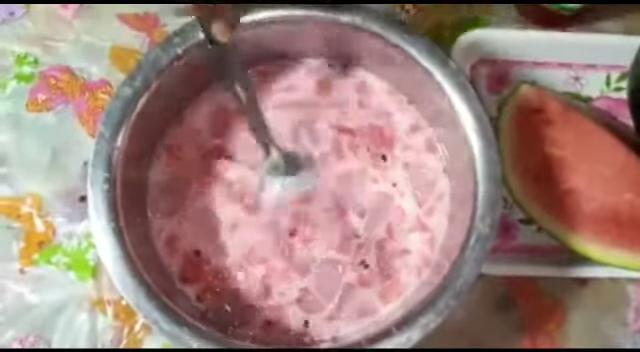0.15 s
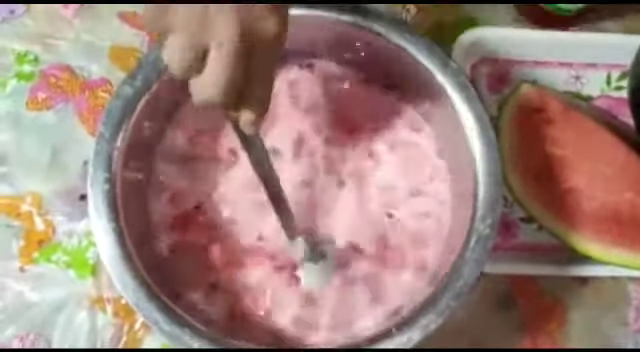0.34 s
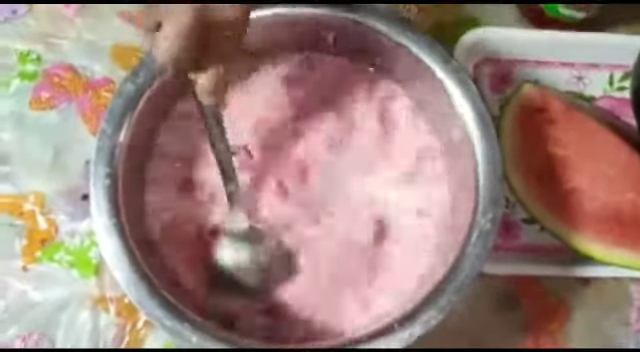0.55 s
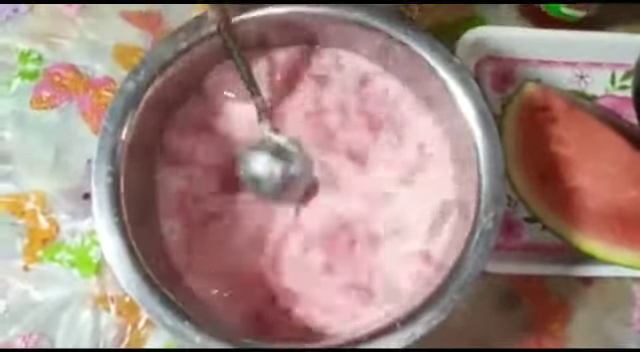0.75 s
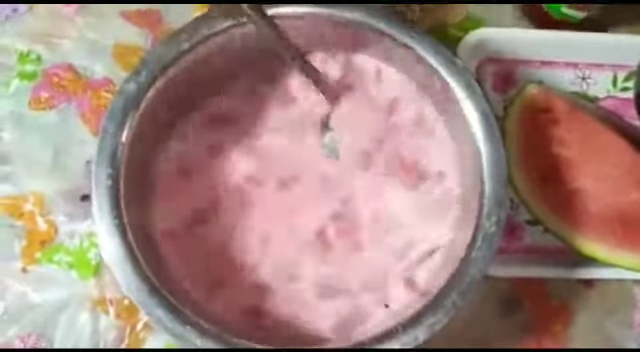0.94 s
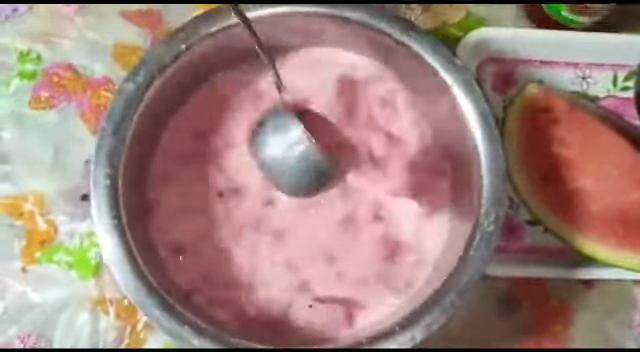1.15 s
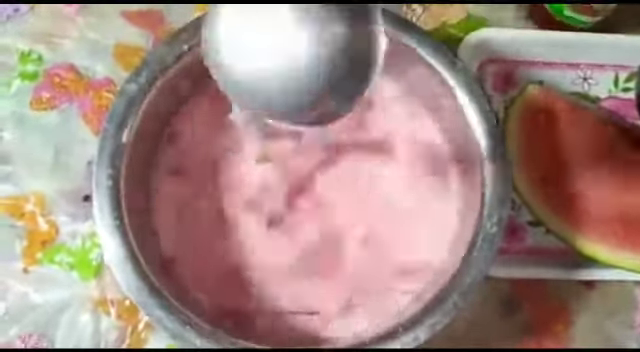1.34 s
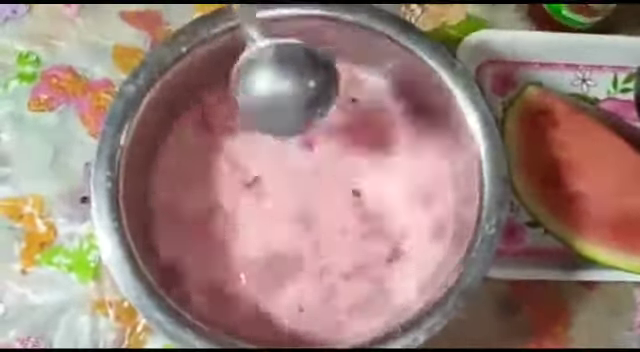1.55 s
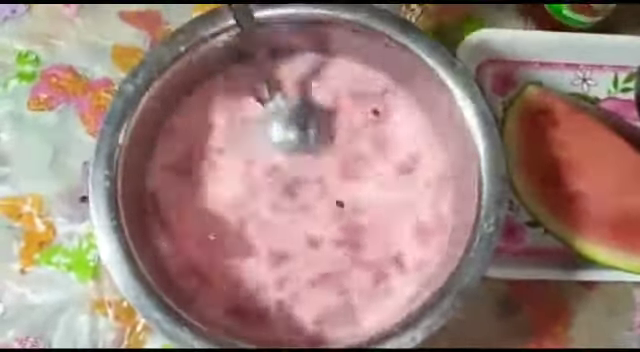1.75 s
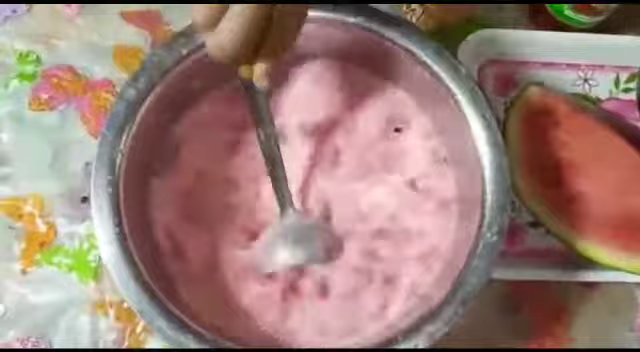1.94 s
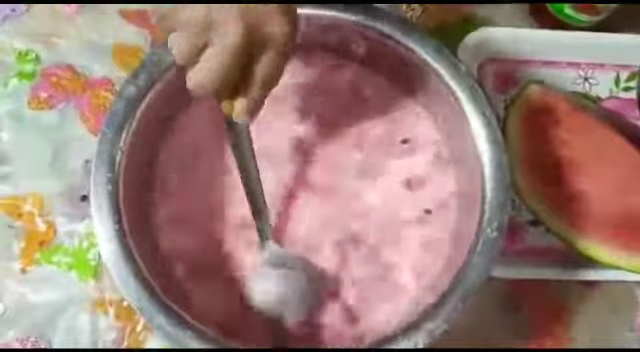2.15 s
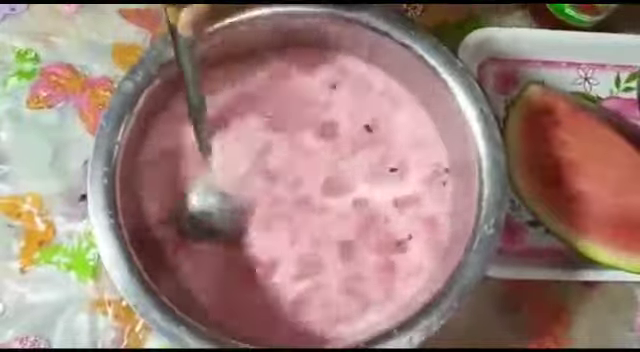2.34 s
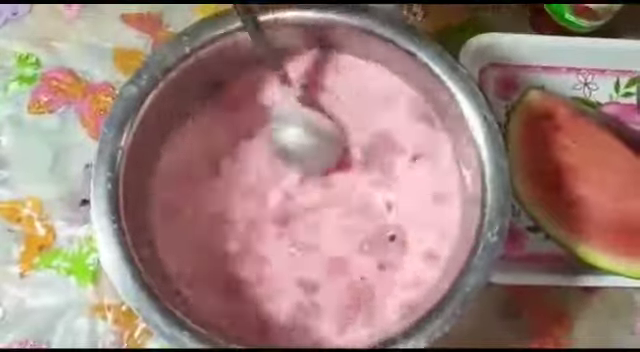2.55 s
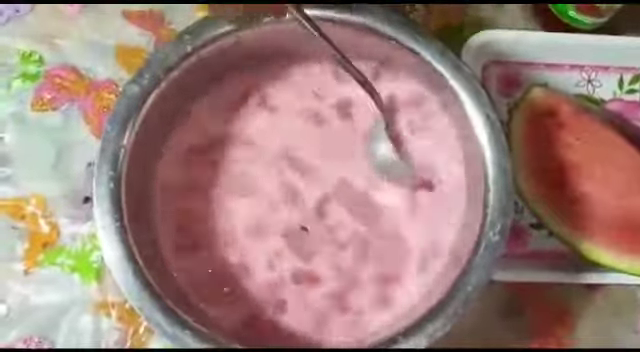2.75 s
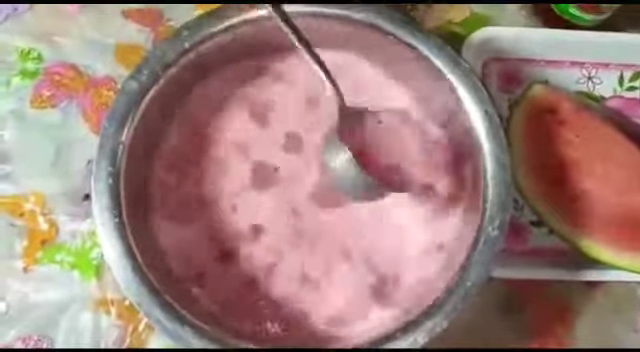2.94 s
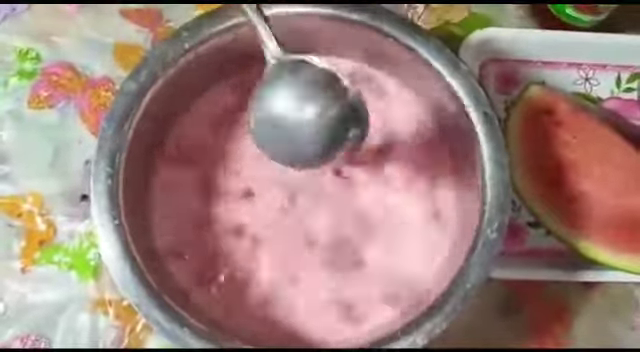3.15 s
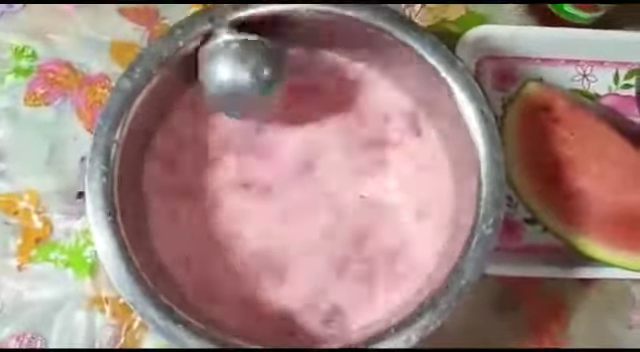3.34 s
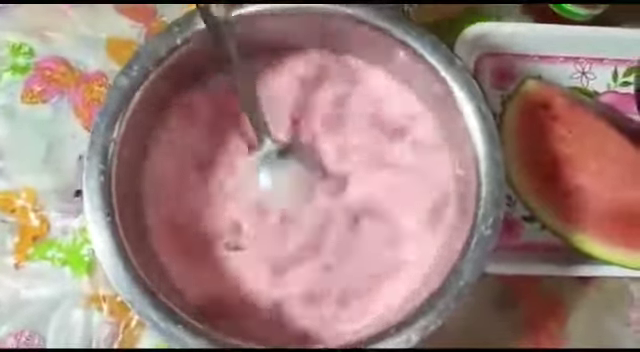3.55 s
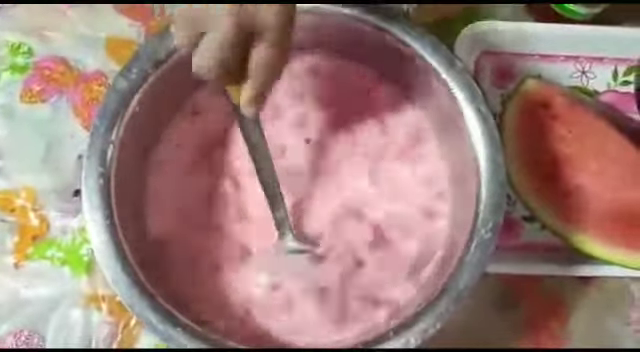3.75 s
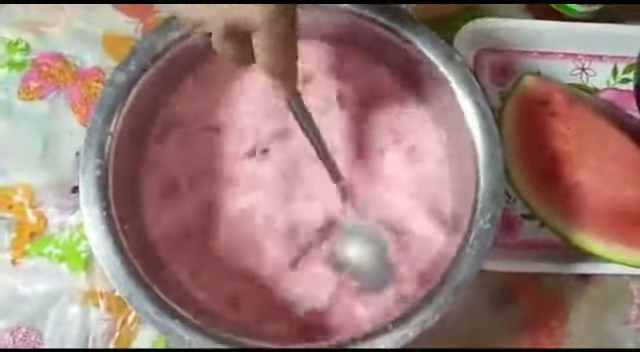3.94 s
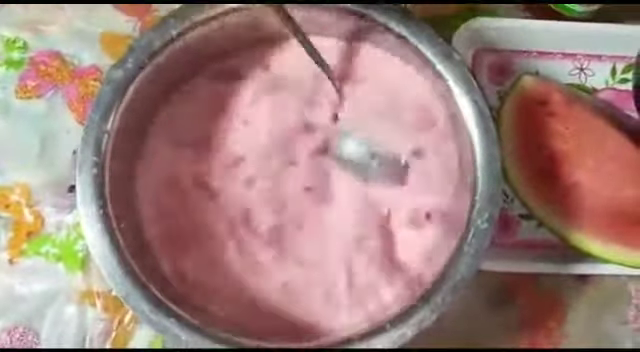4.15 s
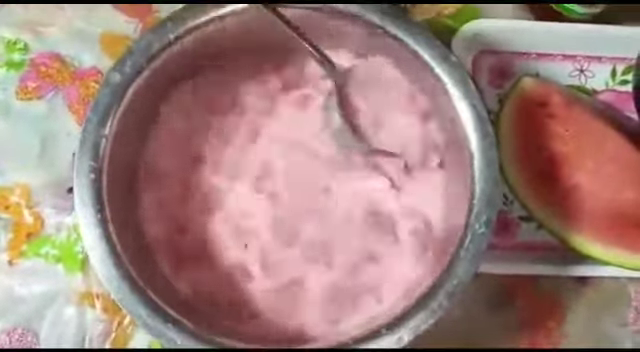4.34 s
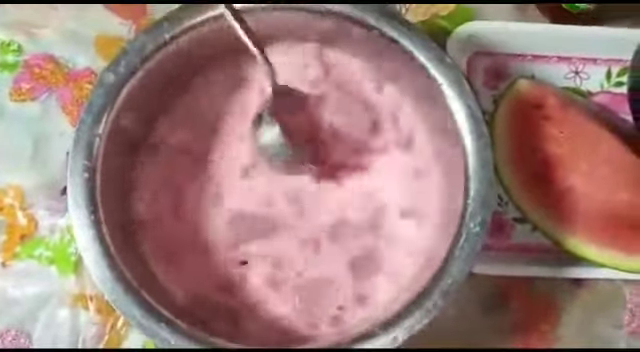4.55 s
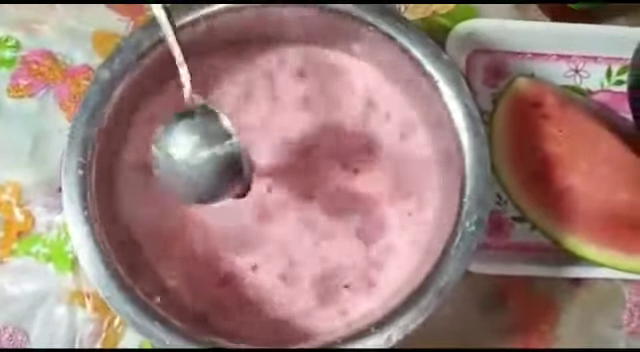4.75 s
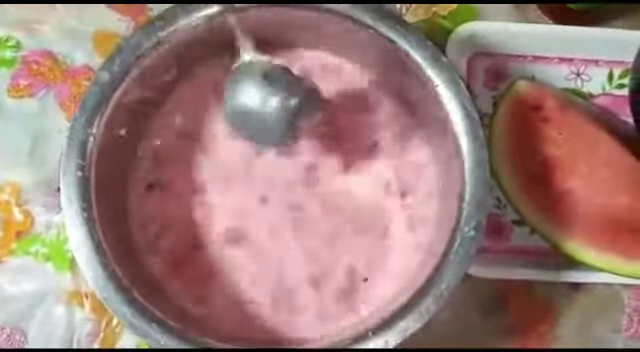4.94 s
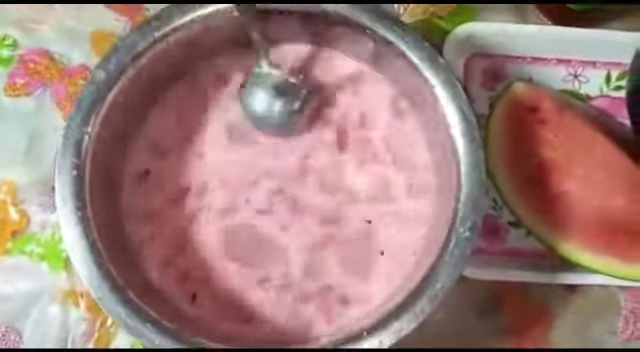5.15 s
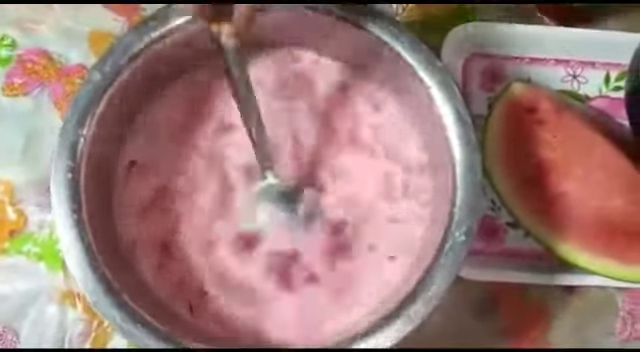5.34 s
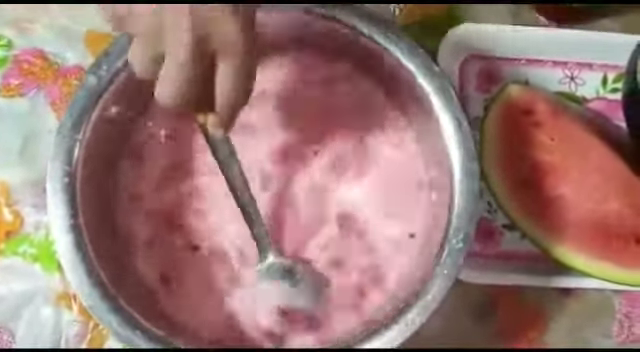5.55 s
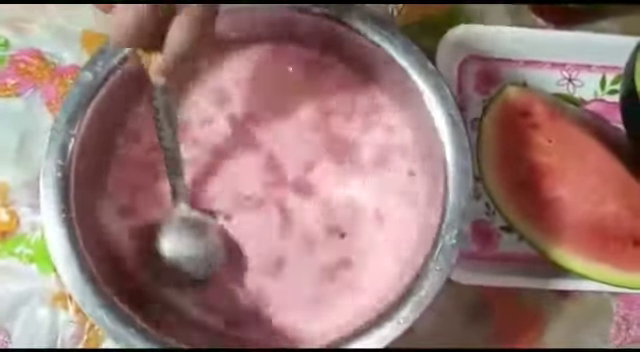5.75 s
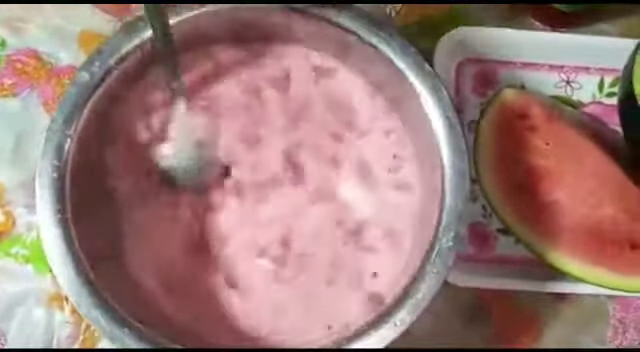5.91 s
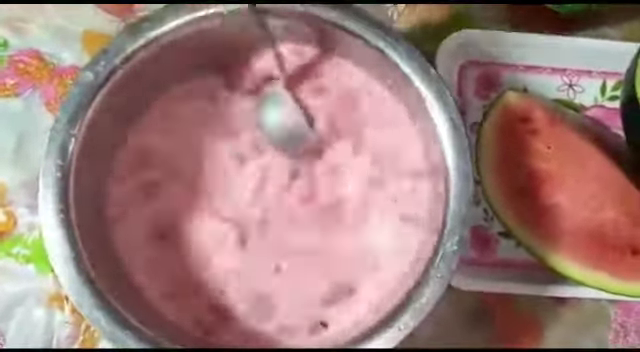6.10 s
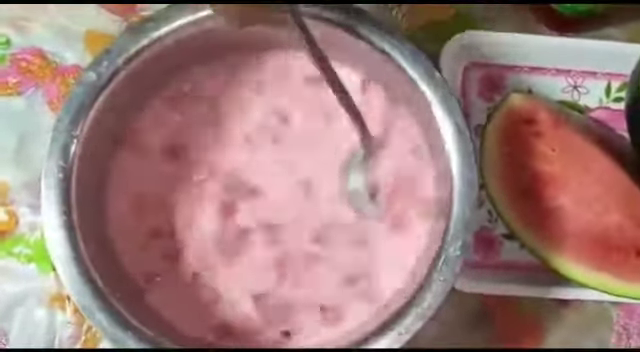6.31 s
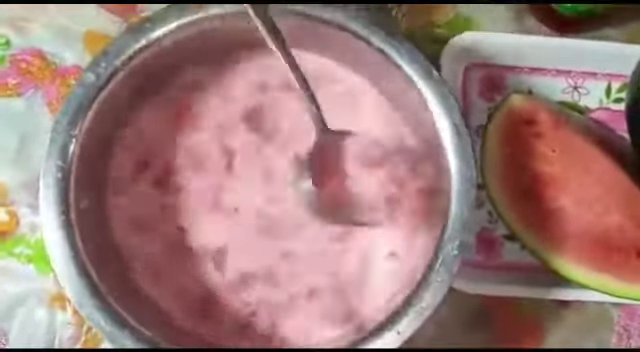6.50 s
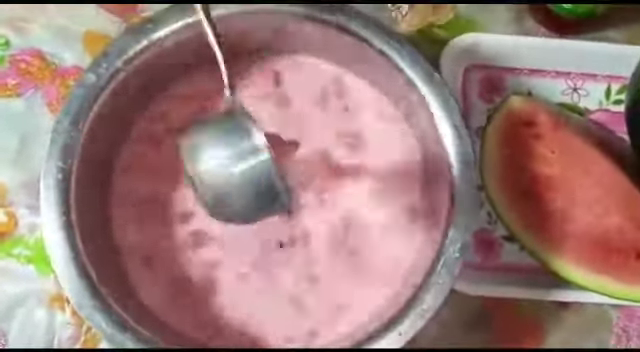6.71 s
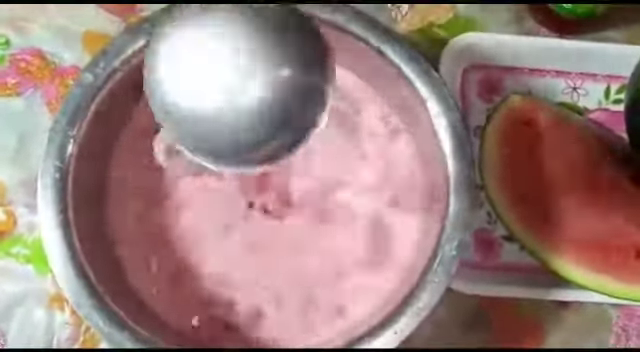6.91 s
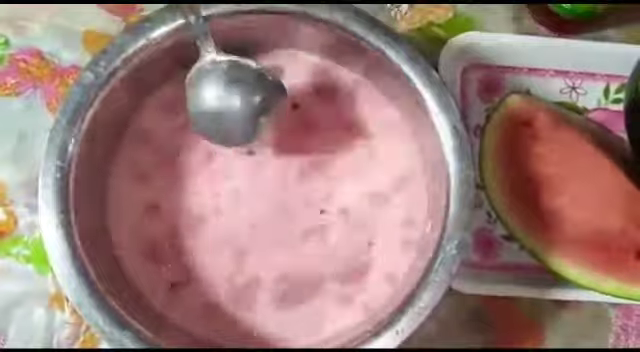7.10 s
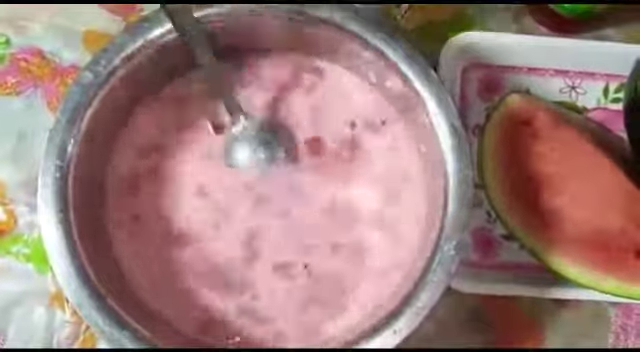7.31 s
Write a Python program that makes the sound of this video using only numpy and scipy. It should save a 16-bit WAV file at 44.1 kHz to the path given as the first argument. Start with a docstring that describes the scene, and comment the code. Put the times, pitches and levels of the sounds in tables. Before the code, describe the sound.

Close to a small microphone in a kitchen, a metal ladle stirs ice cubes through milk in a steel bowl. A loud burst of clinks and hollow knocks opens, then uneven sloshing swells with fizzing slush. Further strong clusters come near two and three and a half seconds, softer stirring follows, and a hard metallic blow ends it.

```python
"""A steel ladle stirs ice cubes in a steel bowl of milk, close to a small microphone in a kitchen.
From the start there is faint air noise, milk that gurgles and fizzes in surges (filtered clicks and noise),
a boom of the bowl and a low rumble of the table. From 0.12 s cubes clink (noise cracks and short rings),
knock dully on the wet bowl (dying sine waves) and make the ladle ring. Near 2.6 and 5.7 s air pockets sing
(sliding tones). A last hard blow falls at the very end; the loudest blows overload the recorder."""
import sys
import numpy as np
from scipy import signal
from scipy.fft import rfft, irfft, next_fast_len
from scipy.io import wavfile
from scipy.ndimage import uniform_filter1d, minimum_filter1d

SR = 44100
rng = np.random.default_rng(int(sys.argv[2]) if len(sys.argv) > 2 else 0)


def to_wav(sig):
    """Store sig (one row per channel, or 1-D mono) as 16-bit WAV at the path in sys.argv[1].

    Samples outside -1..1 are clipped; the rate is SR.
    """
    pcm = np.clip(np.atleast_2d(sig), -1, 1) * 32767
    pcm = np.round(pcm).astype(np.int16)
    wavfile.write(sys.argv[1], SR, pcm.T)  # frames by channels


N = 324925  # length in samples
STEP_S = 0.002  # time step of the swell curves
SWING_DB = 40  # a swell climbs this much in its rise time and drops as much in its fade time


def amp(db):
    """Gain of a level in dB."""
    return 10 ** (np.asarray(db) / 20)


def evened(x):
    """Scales to rms 1."""
    return x / np.sqrt(np.mean(x ** 2) + 1e-20)


def blurred(x, samples):
    """Smooths with two moving averages, one after the other."""
    return uniform_filter1d(uniform_filter1d(x, samples), samples)


def read(points, hz):
    """Value of a table of (Hz, value) at hz, on a logarithmic pitch scale."""
    f, value = np.transpose(points)
    return np.interp(np.log(hz + 1), np.log(f + 1), value)


def add(mix, s, sound):
    """Mixes a sound in at s seconds."""
    part = mix[round(s * SR):][:len(sound)]
    part += sound[:len(part)]


def coloured(x, points):
    """Filters x by a spectrum table."""
    size = next_fast_len(len(x))
    gain = amp(read(points, np.fft.rfftfreq(size, 1 / SR)))
    return irfft(rfft(x, size) * gain, size)[:len(x)]


def ring(t, hz, db, t60, turns):
    """A sum of dying sine waves; t60 is the time to fall by 60 dB, turns the starting phase."""
    hz, db, t60, turns = (np.reshape(v, (-1, 1)) for v in (hz, db, np.maximum(t60, 0.004), turns))
    return (amp(db - 60 * t / t60) * np.sin(2 * np.pi * (hz * t + turns))).sum(0)


def resonate(x, hz, width):
    """A moving resonance: shifts the curve hz down to zero, smooths, and shifts back."""
    turn = np.exp(2j * np.pi * np.cumsum(hz) / SR)
    r = np.exp(-np.pi * width / SR)
    return 2 * (turn * signal.lfilter([1 - r], [1, -r], x / turn)).real


def taps(per_s, spread_db):
    """Sparse clicks of random sign; a few are large."""
    where, size, sign = rng.random((3, round(per_s * N / SR)))
    height = amp(spread_db * np.minimum(-np.log(1 - size), 4))
    return np.bincount((where * N).astype(int), height * np.sign(sign - 0.5), N)


def patchy(x, patch_db, frames, bins):
    """Random islands of time and pitch rise and sink."""
    z = signal.stft(x, nperseg=256, noverlap=192)[2]
    field = rng.standard_normal(z.shape)
    for _ in range(2):
        field = uniform_filter1d(uniform_filter1d(field, round(bins), 0), round(frames), 1)
    z = z * amp(patch_db * evened(field))
    return evened(signal.istft(z, nperseg=256, noverlap=192)[1][:N])


def swells(crest, rise, fade, db):
    """Power of each swell, step by step: a straight climb in dB to its crest, then a straight fall."""
    late = np.arange(0, N / SR + STEP_S, STEP_S)[:, None] - crest
    away = np.maximum(-late / np.maximum(rise, 0.01), late / np.maximum(fade, 0.01))
    return amp(db - SWING_DB * away) ** 2


def smooth(steps):
    """From steps to samples."""
    return np.interp(np.arange(N) / SR, np.arange(len(steps)) * STEP_S, steps)


def level(power, calm_db):
    """Gain of all swells together over a calm level."""
    return smooth(np.sqrt(power.sum(1) + amp(calm_db) ** 2))


# Colour of the kitchen air. Each row: pitch in Hz, relative strength in dB per Hz.
AIR = [(30, 1.5), (48, -9.5), (190, 20.5), (504, 23), (1080, 21.5), (1930, 6), (2520, -6), (5700, -36),
       (8240, -1.5), (15100, -15), (16400, -53)]
AIR_DB = -61.5


def kitchen_air():
    """The air of the room: soft, slightly uneven noise, coloured by its table."""
    noise = patchy(rng.standard_normal(N), 1.4, 20, 4.0)
    return amp(AIR_DB) * evened(coloured(noise, AIR))


# Surges of milk and slush as the ladle pushes; fizz and boom play them too.
# Each row: crest in seconds, rise in seconds, fade in seconds, gurgle level in dB,
# gurgle centre in Hz, fizz level in dB, boom level of the bowl's wall in dB.
SURGES = [(0.18, 0.08, 0.12, -7, 812, -22, -20.5), (0.29, 0.14, 0.46, -16, 490, -23.5, -24),
          (0.461, 0.11, 0.4, -19.5, 834, -37.5, -29.5), (0.62, 0.12, 0.14, -31.5, 906, -32, -26.5),
          (0.77, 0.4, 0.3, -52, 1093, -36.5, -61), (0.858, 0.21, 0.29, -21.5, 586, -40, -60),
          (0.914, 0.25, 0.072, -25, 603, -38.5, -47), (1.001, .06, 0.11, -46.5, 1420, -36, -62),
          (1.065, 0.1, 0.088, -20, 517, -32, -30.5), (1.717, 0.48, 0.17, -42, 666, -43.5, -77),
          (1.829, 0.0064, 0.48, -14.5, 1025, -25, -30), (1.951, 0.11, 0.21, -12.5, 844, -28, -20.5),
          (2.25, 0.04, 0.056, -19.5, 940, -53, -30), (2.53, 0.15, 0.89, -51.5, 1490, -38.5, -49.5),
          (2.72, 0.27, 0.21, -25, 672, -33.5, -45), (2.846, 0.049, 0.23, -12, 853, -25, -21),
          (3.352, 0.089, 0.16, -48, 710, -43, -73), (3.581, 0.058, 0.18, -13, 800, -32.5, -25.5),
          (3.718, 0.16, 0.19, -17, 816, -31.5, -21.5), (3.945, 0.19, 0.47, -31.5, 517, -49.5, -74),
          (4.161, 0.31, 0.35, -34, 1453, -39.5, -54), (4.415, 0.069, 0.23, -32, 481, -39.5, -45),
          (4.679, 0.22, 0.26, -57.5, 678, -52.5, -67), (4.828, 0.087, 0.19, -27, 495, -67, -71),
          (5.328, 0.034, 0.71, -48.5, 494, -43, -38.5), (5.428, 0.029, 0.24, -20, 538, -29, -21),
          (5.55, 0.19, 0.43, -54.5, 526, -44, -53), (5.715, 0.25, 0.047, -37.5, 1085, -46, -56),
          (5.867, 0.14, 0.41, -26, 496, -37, -39), (6.07, 0.084, 0.31, -23, 600, -33, -38.5),
          (6.22, 0.12, 0.24, -24.5, 587, -33, -39.5), (6.36, 0.056, 0.12, -13, 455, -30, -58.5),
          (6.439, 0.17, 0.25, -24, 505, -35, -20.5), (6.575, 0.32, 0.015, -46.5, 652, -39, -48.5),
          (7.029, 0.3, 0.66, -41, 1184, -48.5, -56), (7.363, 0.04, .3, -16.5, 980, -14, -50)]
# Middle resonances of the wet bowl. Each row: pitch in Hz, width in Hz,
# level in dB when the surge has the same pitch.
WET = [(514.7, 36, -9.5), (981, 66, -12.5)]
# Colour of the wash. Each row: pitch in Hz, relative strength in dB per Hz.
WASH = [(180, -27.5), (300, -9), (697, 6), (810, 2), (1000, 5), (1920, -4), (2500, 0), (3250, -61), ]
CALM_GURGLE_DB = -69  # between the swells


def gurgle():
    """Small bumps of floating cubes ring a wandering hollow resonance and the wet bowl, over a wider wash."""
    crest, rise, fade, db, surge_hz, _, _ = np.transpose(SURGES)
    power = swells(crest, rise, fade, db)
    hz = smooth(power @ surge_hz / power.sum(1))  # the strongest surge sets the pitch
    wander, drift = (evened(blurred(v, 1500)) for v in rng.standard_normal((2, N)))
    hz = hz * (1 + 0.051 * wander)
    # each resonance is passed twice, for steep skirts
    hollow = evened(resonate(resonate(taps(260, 4.2), hz, 99), hz, 400))
    bowl = 0
    for f, width, wet_db in WET:
        tone = resonate(taps(220, 7.5), f * (1 + 0.032 * drift), width)
        tone = evened(resonate(tone, f * (1 + 0.088 * drift), 450))
        octaves_away = abs(np.log2(hz / f))
        bowl = bowl + amp(wet_db - 4.1 * octaves_away) * tone
    wash = evened(coloured(patchy(taps(900, 1.9), 4.6, 9, 1.3), WASH))
    wash = evened(resonate(wash, hz, 700))  # the wash leans to the pitch of the surge
    return level(power, CALM_GURGLE_DB) * (amp(-10.5) * hollow + bowl + amp(-5.0) * wash)


# Colour of the fizz. Each row: pitch in Hz, relative strength in dB per Hz.
FIZZ = [(710, -53), (1200, -0.5), (1580, -6), (2850, -6), (3990, -9), (7130, -15), (8580, -33.5),
        (10800, -36), (13600, -52), (15100, -34.5), (16400, -56.5)]
CALM_FIZZ_DB, FIZZ_LINGERS = -58.5, 1.47  # level between swells; fade time against the gurgle's
CHIPS = 0.25  # tinkling chips against the rush
PUFF_SPREAD_DB, STREAK_DB = 4, 3.8  # unevenness of puffs and streaks


def fizz():
    """A dense, uneven rush of slush (noise), mixed with many tiny tinkling chips (short rings)."""
    grains, t = np.zeros(N), np.arange(1500) / SR
    for hz in np.geomspace(1700, 7000, 24):
        grain = np.sin(2 * np.pi * hz * t) * np.exp(-t * hz / 25) * (1 - np.exp(-t / 0.00079))
        grain = grain / np.linalg.norm(grain) * np.sqrt(hz)
        grains += signal.oaconvolve(taps(30, 3.2), grain)[:N]
    # short puffs at random moments make the rush uneven
    bursts = signal.oaconvolve(abs(taps(300, PUFF_SPREAD_DB)), np.exp(-t / 0.0015))[:N]
    puffs = 1 + evened(bursts)
    rush = patchy(rng.standard_normal(N) * puffs, 2.4, 60.0, 4.0)
    rush = patchy(rush, STREAK_DB, 24.0, 1.0)  # thin random streaks in the hiss, narrow in pitch
    crest, rise, fade, _, _, db, _ = np.transpose(SURGES)
    gain = level(swells(crest, rise, FIZZ_LINGERS * fade, db), CALM_FIZZ_DB)
    return gain * evened(coloured(CHIPS * evened(grains) + rush, FIZZ))


# Low resonances of the wet bowl. Each row: pitch in Hz, width in Hz, relative level in dB.
BOWL = [(206.5, 28, 12), (266.7, 29, 8.5), (360, 150, 12)]
CALM_BOOM_DB, BOOM_LINGERS = -63, 0.88  # level between swells; fade time against the gurgle's
BOOM_LAG_S = 0.009  # the wall answers late


def boom():
    """Bumps of the cubes and surges of milk keep the low resonances of the wall sounding."""
    bumps = taps(150, 1.2)
    wall = sum(amp(db) * evened(resonate(bumps, np.full(N, hz), width)) for hz, width, db in BOWL)
    wall = signal.sosfilt(signal.butter(3, [130, 420], "band", fs=SR, output="sos"), wall)
    crest, rise, fade, _, _, _, db = np.transpose(SURGES)
    power = swells(crest + BOOM_LAG_S, rise, BOOM_LINGERS * fade, db)
    return level(power, CALM_BOOM_DB) * evened(wall)


# Low rumbles through the table.
# Each row: crest in seconds, rise in seconds, fade in seconds, level in dB.
RUMBLES = [(0.171, 0.17, 0.32, -37.5), (1.22, 0.15, 0.11, -37), (1.421, 0.11, 0.92, -38),
           (1.59, 0.6, 0.3, -33.5), (1.97, .25, 0.24, -44), (2.27, 0.087, 0.49, -44),
           (2.54, 0.05, 0.034, -38), (5.381, 0.035, 0.19, -21.5), (5.461, 0.25, 0.37, -28.5),
           (5.728, 0.14, 0.16, -37.5), (6.228, 0.14, 0.084, -39), (6.452, 0.21, 0.36, -39.5),
           (7.36, 0.031, .3, -32)]
CALM_RUMBLE_DB = -68.5  # between the swells


def rumble():
    """Slow lumpy swings near 70 Hz, carried by the table."""
    lumps = signal.sosfilt(signal.butter(3, [50, 100], "band", fs=SR, output="sos"), taps(60, 2.1))
    return level(swells(*np.transpose(RUMBLES)), CALM_RUMBLE_DB) * evened(lumps)


# How the kitchen's echo dies. Each row: pitch in Hz, time to fall by 60 dB in seconds.
KITCHEN = [(200, 0.33), (1000, 0.17), (3000, 0.13), (8000, 0.075)]


def kitchen_echo(x):
    """The room's echo: sparse taps of random sign, each band dying at its own speed."""
    tail = np.zeros(SR // 2)
    at = np.arange(200, len(tail) - 20, 20)
    tail[at + rng.integers(0, 20, len(at))] = rng.choice([-1., 1.], len(at))
    hz, t, z = signal.stft(tail, SR, nperseg=256)
    z = z * amp(-60 * t / read(KITCHEN, hz)[:, None])
    tail = signal.istft(z, SR, nperseg=256)[1]
    return signal.fftconvolve(x, tail / np.linalg.norm(tail))[:N]


# Sharp clinks of ice. Each row: time in seconds, level in dB, pitch in Hz,
# brightness in dB (the part above 4500 Hz against the part below).
CLINKS = [(0.1165, -22, 5550, -28), (0.1392, -3.5, 4740, 6.5), (0.1681, -7, 2770, -3),
          (0.2668, -7.5, 2310, -3), (0.438, -16, 2630, 12), (0.587, -15, 2790, -3), (0.673, -18, 3260, -31),
          (0.827, -22.5, 3180, -19), (0.8538, -20, 2510, -28), (0.981, -24.5, 2400, -24),
          (1.0063, -18.5, 2260, -32), (1.0195, -28, 4970, 3), (1.042, -22, 2430, -31),
          (1.184, -27.5, 2730, -36), (1.3048, -21, 2100, -5), (1.344, -21.5, 6120, 5),
          (1.497, -27, 5080, 18), (1.549, -23, 3125, -27), (1.6542, -27, 3310, 3), (1.8058, -4, 2345, -1),
          (1.8308, -10, 2310, -4), (1.8626, -14.5, 5630, 0), (1.929, -7, 2340, 0.5),
          (1.938, -13.5, 2130, 2), (2.0043, -22.5, 3240, -16), (2.0494, -19.5, 2590, -5),
          (2.0738, -21.5, 2470, -22), (2.244, -20.5, 3390, -19), (2.33, -17.5, 2860, -22),
          (2.5119, -22.5, 2830, -24), (2.5656, -14, 5470, 8), (2.619, -24, 3000, 5),
          (2.6988, -25.5, 2410, 6), (2.8151, -14.5, 3350, -13), (2.839, -11, 2950, 2),
          (2.947, -17.5, 3470, -4), (3.007, -19, 2810, -28), (3.026, -27.5, 5920, -2),
          (3.0806, -24.5, 3520, -5), (3.132, -27.5, 6500, -15.5), (3.199, -26, 3340, -18),
          (3.329, -27, 2780, -26), (3.422, -26, 2820, -24), (3.4307, -25.5, 2930, 3),
          (3.5446, -15, 6200, -2), (3.5762, -11, 5530, 0), (3.603, -12.5, 5730, 0), (3.64, -22, 6200, 15),
          (3.658, -11, 5900, -4.5), (3.6682, -12.5, 2320, -10), (3.94, -28.5, 3560, 20),
          (4.007, -34.5, 3040, 2), (4.064, -28, 3260, 5), (4.144, -19.5, 3300, -13),
          (4.204, -22, 5840, -28), (4.269, -25.5, 3480, -26), (4.334, -23.5, 5200, 7),
          (4.3865, -19, 4600, 14), (4.39, -19.5, 2050, -25), (4.442, -27.5, 3600, -20),
          (4.497, -28, 3350, -11), (4.545, -27.5, 4510, -36), (4.657, -30.5, 3820, -16),
          (4.668, -23.5, 2330, 5), (4.8016, -20.5, 2210, -6), (4.939, -27.5, 2050, -30),
          (5.2372, -33, 2240, -18.5), (5.3076, -24, 2760, -2), (5.4013, -15.5, 2490, -3),
          (5.455, -33, 2700, -8), (5.566, -25.5, 4400, 9), (5.8393, -22, 1760, -17),
          (5.9415, -16.5, 3910, 6), (6.0469, -20.5, 1860, -9), (6.131, -28.5, 4500, -8),
          (6.175, -26.5, 2400, -4), (6.295, -26, 5080, 3), (6.3432, -19.5, 2410, 1), (6.376, -23, 3630, -9),
          (6.4145, -16, 2480, -2), (6.4542, -22.5, 3540, -22), (6.9637, -28, 7100, -17),
          (7.0175, -22, 2900, -3), (7.083, -28.5, 2500, -6), (7.3326, -20, 5770, 0), (7.354, -14, 2930, 18),
          (7.362, -13, 5900, 13)]
# Colour of the cracks. Each row: pitch in Hz, relative strength in dB per Hz.
TICK = [(300, -54.5), (1140, -5.5), (1720, -13.5), (2400, -5), (4230, -11.5), (5900, -4.5), (8640, -22),
        (15200, -33), (16000, -39)]
CLINK_RISE_S, CLINK_T60_S = 0.00013, 0.018  # rise at 0 dB, longer for soft touches; shortest main ring
RATTLE_DB, RATTLE_T60_S = -15.0, 0.1  # rough after-ring of a cube
CRACK_LAW = 1.6  # crack dB per blow dB


def clinks():
    """A crack of a few ms and the short rings of the cube, split in a dull and a bright part."""
    cracks, out, t = np.zeros((2, N)), np.zeros(N), np.arange(SR // 12) / SR
    draws, snaps = rng.random((len(CLINKS), 6)), rng.standard_normal((len(CLINKS), 2, 500))
    # the cube keeps rattling
    shakes = evened(uniform_filter1d(rng.standard_normal((len(CLINKS), len(t))), 260))
    for (s, db, hz, bright_db), u, snap, shake in zip(CLINKS, draws, snaps, shakes):
        dull_db = -10 * np.log10(1 + amp(2 * bright_db))  # the two parts share the energy
        parts_db = np.array([dull_db, dull_db + bright_db])
        main_hz = [hz, hz * (0.95 + 0.082 * u[5])]
        other_hz = [2000 + 2300 * u[0], 2000 + 2300 * u[1], 4600 + 2600 * u[2], 4600 + 2600 * u[3]]
        other_db = np.repeat(parts_db, 2) - 3.5 + 0.065 * db
        cube = ring(t, main_hz, [-3, -6], CLINK_T60_S * (1 + u[4]), 0)
        cube += ring(t, other_hz, other_db, 0.022, 0)
        rattle_db = [RATTLE_DB, RATTLE_DB + dull_db]
        cube += ring(t, [hz, other_hz[0]], rattle_db, RATTLE_T60_S, 0) * shake
        rise_s = CLINK_RISE_S * amp(-0.55 * db)  # a soft touch sets in slowly
        rise = (1 - np.exp(-t / rise_s)) ** 2
        s = s - rise_s
        add(out, s, amp(db) * cube * rise)
        for crack, noise, part_db, fade_s in zip(cracks, snap, parts_db, (0.0037, 0.002)):
            burst = noise * np.exp(-t[:500] / fade_s) * rise[:500]
            add(crack, s, amp(CRACK_LAW * db + part_db) * burst)  # harder blows crack more
    colour = coloured(signal.unit_impulse(512, "mid"), TICK)
    for crack, kind in zip(cracks, ("low", "high")):
        part = signal.sosfilt(signal.butter(3, 4500, kind, fs=SR, output="sos"), colour)
        out += amp(9.0) * signal.oaconvolve(crack, part / np.linalg.norm(part), "same")
    return out


# Cubes knocking on the bowl. Each row: start in seconds, level in dB, main pitch in Hz,
# time in which the main pitch falls by 60 dB in seconds.
KNOCKS = [(0.1396, 6, 988, 0.033), (0.167, 5, 1220, 0.016), (0.175, -2, 1192, 0.029),
          (0.2129, -8, 455, 0.037), (0.234, -16, 478, 0.064), (0.2671, -6.5, 1337, 0.079),
          (0.273, -5.5, 880, 0.05), (0.2837, -15, 459, 0.062), (0.3515, -5.5, 978, 0.039),
          (0.411, -12.5, 1444, 0.025), (0.439, 0.5, 1268, 0.025), (0.504, -11.5, 990, 0.04),
          (0.5857, -5, 891, 0.1), (0.6272, -14, 970, 0.021), (0.6332, -1, 934, 0.05),
          (0.8561, -9, 1230, 0.024), (0.857, -21, 533, 0.07), (1.0418, -8, 1305, 0.014),
          (1.0517, -11.5, 490, 0.066), (1.3437, -25.5, 1520, 0.029), (1.5504, -18, 1866, 0.018),
          (1.7, -22.5, 568, 0.088), (1.8062, 4, 945, 0.048), (1.826, 0, 904, 0.02),
          (1.866, -9.5, 597, 0.05), (1.9287, 3.5, 915.6, 0.07), (1.9361, -2, 905, 0.058),
          (1.9537, -6, 970, 0.011), (1.999, -18.5, 422, 0.1), (2.197, -29, 930, 0.28),
          (2.2421, -6.5, 897, 0.036), (2.3, -1.5, 1061, 0.044), (2.3121, -10.5, 1120, 0.021),
          (2.611, -19, 920, 0.025), (2.675, -5, 1196, 0.016), (2.7176, -7.5, 692, 0.029),
          (2.822, -2, 1130, 0.025), (2.837, -5.5, 568, 0.052), (2.8392, 1.5, 1100, 0.019),
          (2.8934, -5.5, 1066, 0.041), (3.171, -38, 1606, 0.086), (3.328, -48, 689, 0.25),
          (3.542, -2, 780, 0.02), (3.5781, -3.5, 955, 0.082), (3.604, -10.5, 1265, 0.05),
          (3.6602, 8, 875, 0.0056), (3.6732, -7, 839, 0.092), (3.707, -11, 550, 0.033),
          (3.721, -8.5, 827, 0.12), (3.883, -17.5, 1210, 0.025), (3.921, -15.5, 874, 0.04),
          (3.9975, -12.5, 708, 0.036), (4.116, -26, 1070, 0.023), (4.1309, -11, 970, 0.022),
          (4.1455, -14.5, 1150, 0.015), (4.1655, -11, 1460, 0.014), (4.175, -14, 1430, 0.029),
          (4.1922, -13, 1000, 0.021), (4.3346, -21.5, 790, 0.041), (4.389, -22.5, 498, 0.065),
          (4.415, -31, 438, 0.24), (4.4731, -15.5, 1098, 0.037), (4.668, -46.5, 660, 0.42),
          (4.755, -31, 1514, 0.086), (4.8023, -5.5, 1413, 0.024), (4.804, -9, 1055, 0.034),
          (4.8256, -24.5, 572, 0.18), (5.3047, -12.5, 1220, 0.024), (5.336, -26, 515, 0.086),
          (5.399, -5.5, 1540, 0.018), (5.4024, -9, 489, 0.075), (5.4382, -16, 517, 0.05),
          (5.646, -17.5, 1150, 0.015), (5.7937, -17.5, 519, 0.063), (5.8413, -9.5, 1170, 0.017),
          (5.8413, -10.5, 496, 0.043), (5.89, -9.5, 1390, 0.01), (5.996, -22, 503, 0.047),
          (6.043, -8, 1103, 0.022), (6.0461, -7.5, 525, 0.043), (6.1755, -19, 874, 0.049),
          (6.2095, -27.5, 480.3, 0.3), (6.3422, -11.5, 307, 0.15), (6.342, -5, 1126, 0.026),
          (6.415, -1, 488, 0.059), (6.415, -2.5, 1104, 0.033), (6.4453, -7, 622, 0.042),
          (7.007, -18, 1192, 0.028), (7.0207, -25, 1070, 0.023), (7.3303, -20.5, 905, 0.16),
          (7.3564, 3, 979, 0.15)]
KNOCK_RISE_S = 0.0005  # at 0 dB, longer for soft touches


def knocks():
    """Each blow sounds a beating group of modes (natural tones) of the bowl, damped by the milk."""
    out, t = np.zeros(N), np.arange(SR // 5) / SR
    for (s, db, hz, t60), u in zip(KNOCKS, rng.random((len(KNOCKS), 3))):
        side_db = 0.5 * db + np.array([-6, -12, -14])  # a soft blow wakes mostly one mode
        side_hz = hz * np.array([1.06 + 0.11 * u[0], 0.46 + 0.12 * u[1], 1.3 + 0.292 * u[2]])
        modes = ring(t, hz, 0, t60, 0) + ring(t, side_hz, side_db, 1.08 * t60, 0)
        rise_s = KNOCK_RISE_S * amp(-0.25 * db)
        rise = (1 - np.exp(-t / rise_s)) ** 2  # wet contact: a rounded start
        add(out, s, amp(db) * modes * rise)
    return out


# Cubes that strike the ladle and make it ring. Each row: start in seconds, level in dB.
LADLE_HITS = [(0.1398, -21), (1.8085, -22), (1.8618, -29), (3.5453, -36.5), (3.5779, -20.5), (4.6714, -43),
              (7.3573, -19)]
# Pitches of the ladle's modes: a single list in Hz.
LADLE_HZ = [2314, 2900, 4975, 5673, 6190]
# The same modes in the same order. Each row: level against the hit in dB,
# time to fall by 60 dB in seconds.
LADLE = [(-28.5, 0.1), (3.5, 0.011), (-16, 0.046), (-1.5, 0.35), (6, 0.24)]
SHIMMER = 0.45  # unevenness of the steel's ring


def ladle():
    """The steel rings with its own modes, each weakened at random by up to 5 dB."""
    out, t = np.zeros(N), np.arange(SR // 4) / SR
    mode_db, t60 = np.transpose(LADLE)
    for (s, db), u in zip(LADLE_HITS, rng.random((len(LADLE_HITS), 2, len(LADLE)))):
        steel = ring(t, LADLE_HZ, db + mode_db - 5 * u[0], t60, u[1])
        add(out, s, steel * (1 - np.exp(-t / 0.00029)))
    wavering = evened(blurred(rng.standard_normal(N), 250))  # slow random wavering of the ring's loudness
    return out * (1 + SHIMMER * wavering)


# Large air pockets that sing for a moment.
# Each row: start in seconds, level in dB, first pitch in Hz, last pitch in Hz, length in seconds.
BUBBLES = [(2.568, -25, 197, 293, 0.03), (5.682, -24.5, 1118, 950, 0.039), (5.716, -25.5, 976, 1050, 0.054)]


def bubbles():
    """A short soft tone slides as the pocket changes shape; it wobbles, breaks up and dies away."""
    out = np.zeros(N)
    for s, db, start_hz, end_hz, length in BUBBLES:
        hz = np.linspace(start_hz, end_hz, round(length * SR))
        sway, throb = (evened(blurred(v, 250)) for v in rng.standard_normal((2, len(hz))))
        fade_db = np.linspace(0, -10, len(hz))
        shape = signal.windows.tukey(len(hz), 0.3) * amp(2.5 * throb + fade_db)
        tone = np.sin(2 * np.pi * np.cumsum(hz * (1 + 0.051 * sway)) / SR)
        add(out, s, amp(db) * tone * shape)
    return out


def scene():
    """Blows and milk with their echo, the low sounds and the air of the room."""
    milk = gurgle() + fizz()
    blows = clinks() + knocks() + ladle()
    near = blows + milk + kitchen_echo(amp(-11.0) * blows + amp(-20.5) * milk)
    # the blows and the milk carry little below about 200 Hz
    near = signal.sosfilt(signal.butter(3, 210, "high", fs=SR, output="sos"), near)
    return (kitchen_air() + near + boom() + rumble() + bubbles())[None]


EDGE_HZ = 15600  # upper band limit


def record(dry):
    """A limiter holds the peaks down and the last of them flatten at the ceiling; then the band limit."""
    dry = signal.sosfilt(signal.butter(1, 40, "high", fs=SR, output="sos"), dry)  # small capsule
    ceiling, knee = 0.8, 5  # a higher knee bends more sharply
    room = minimum_filter1d(np.minimum(1, 1 / (abs(dry) + 1e-9)), 90, axis=1)
    held = dry * uniform_filter1d(room, 60, axis=1)
    held = held / (1 + abs(held / ceiling) ** knee) ** (1 / knee)
    band = signal.firwin(255, EDGE_HZ, window=("kaiser", 9), fs=SR)
    return signal.oaconvolve(held, band[None], "same")


dry = scene()
out = record(dry)
to_wav(out)
```